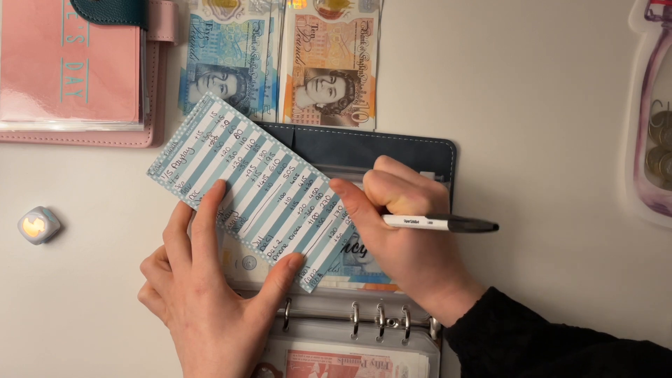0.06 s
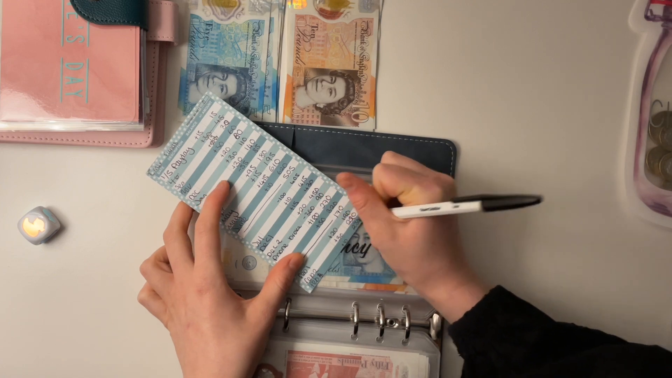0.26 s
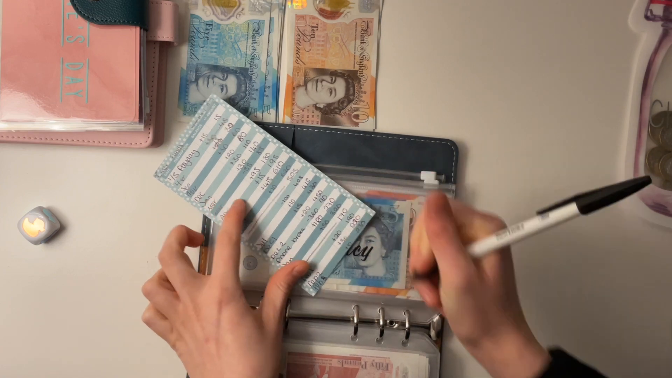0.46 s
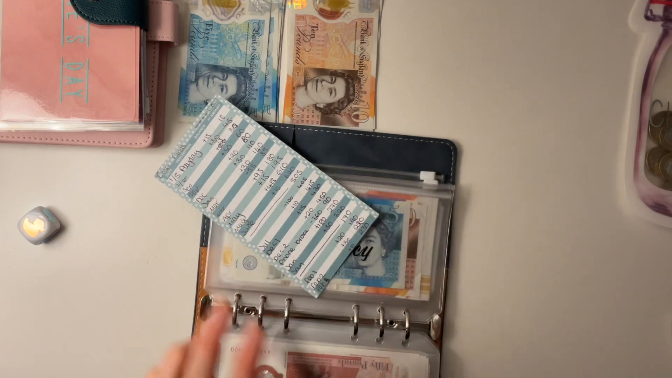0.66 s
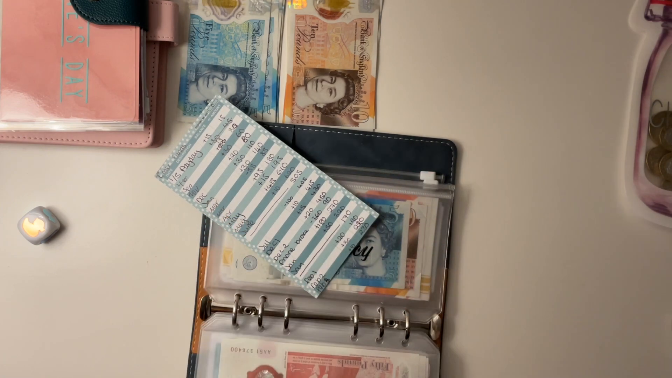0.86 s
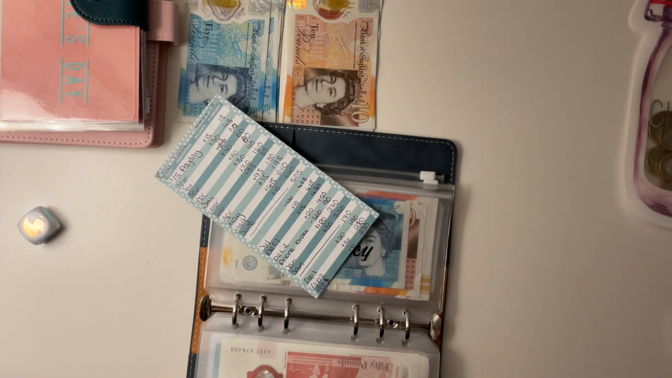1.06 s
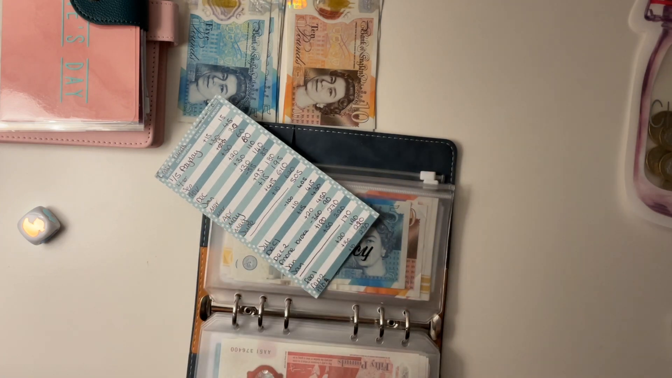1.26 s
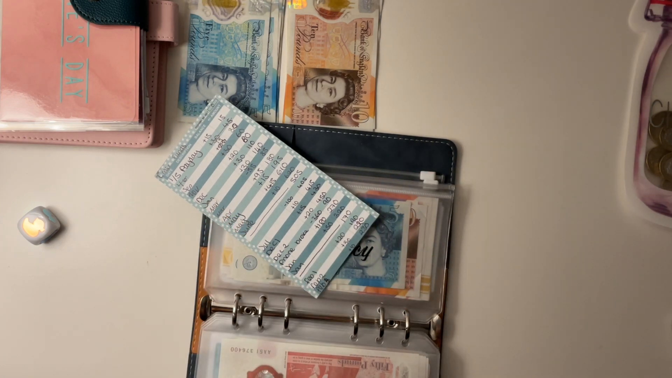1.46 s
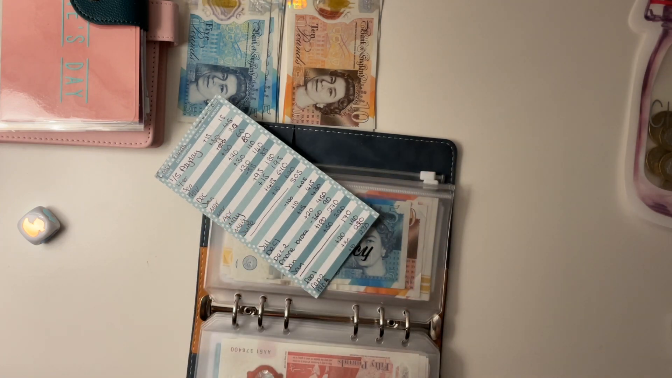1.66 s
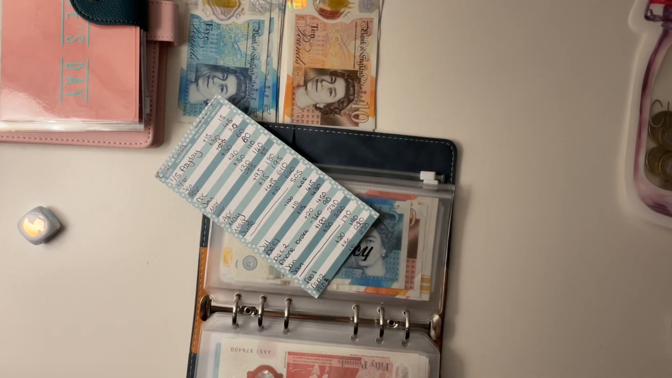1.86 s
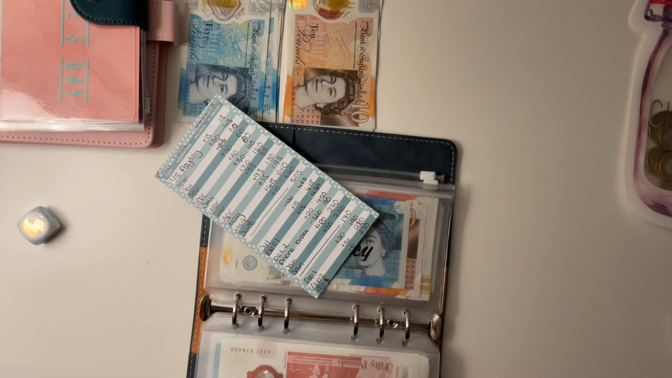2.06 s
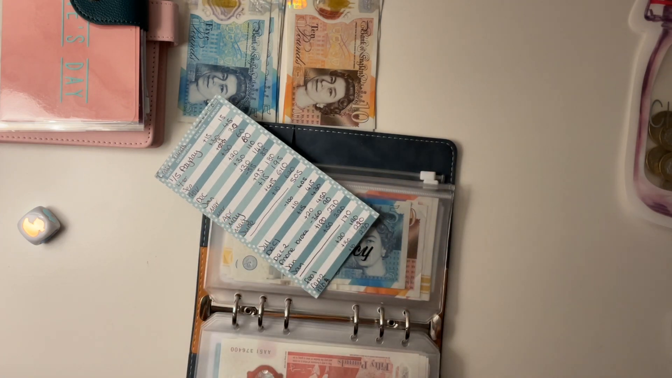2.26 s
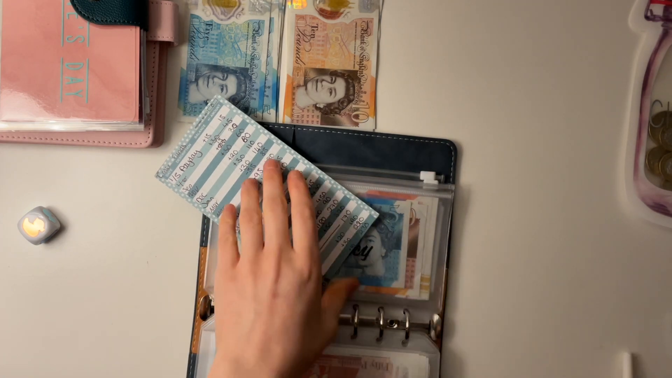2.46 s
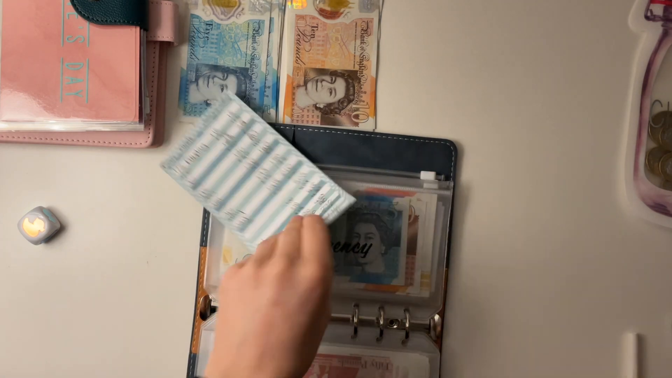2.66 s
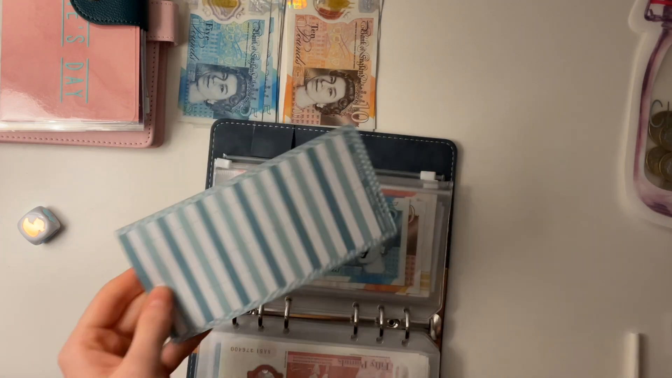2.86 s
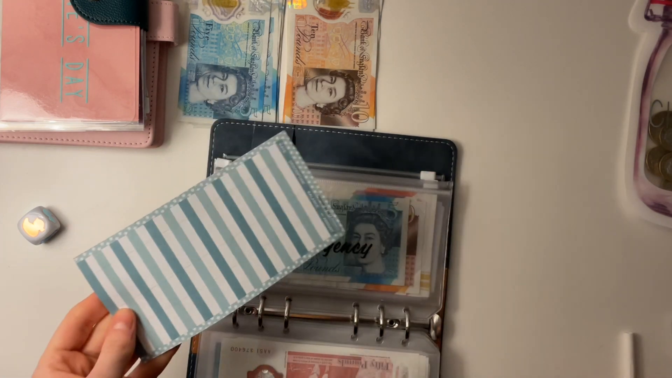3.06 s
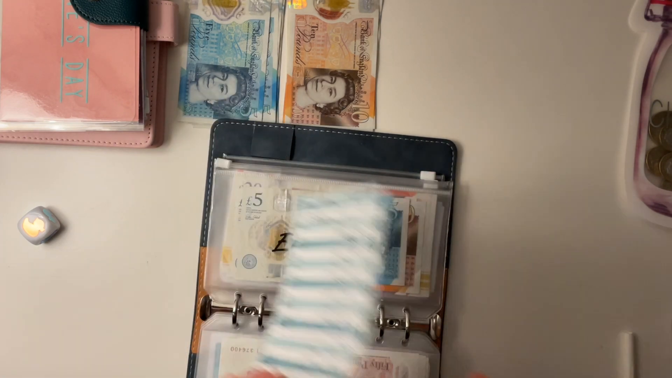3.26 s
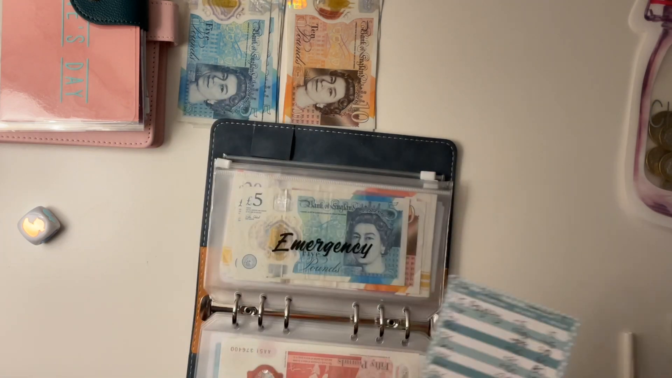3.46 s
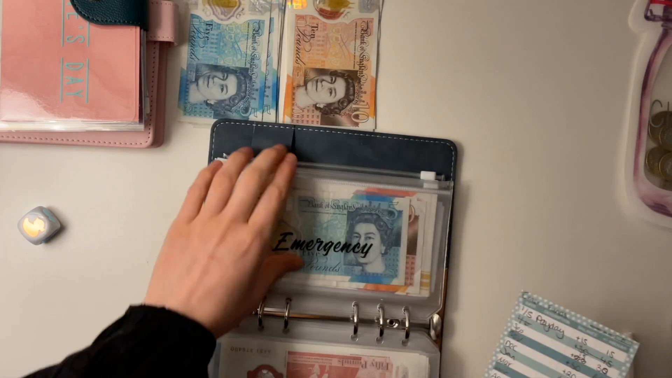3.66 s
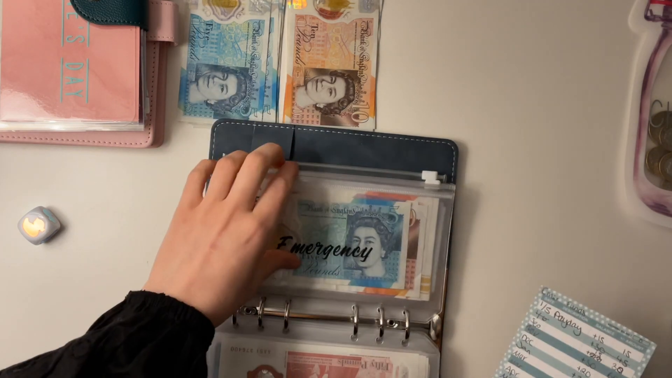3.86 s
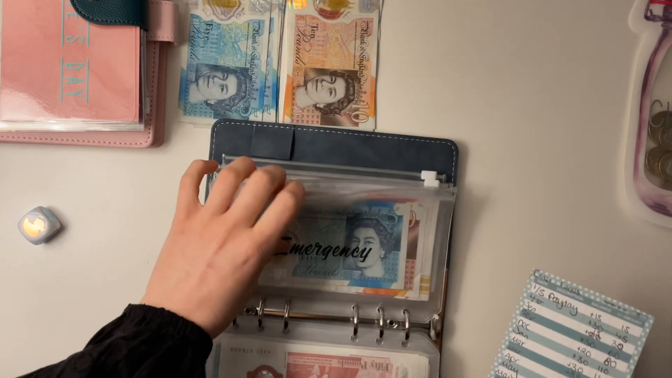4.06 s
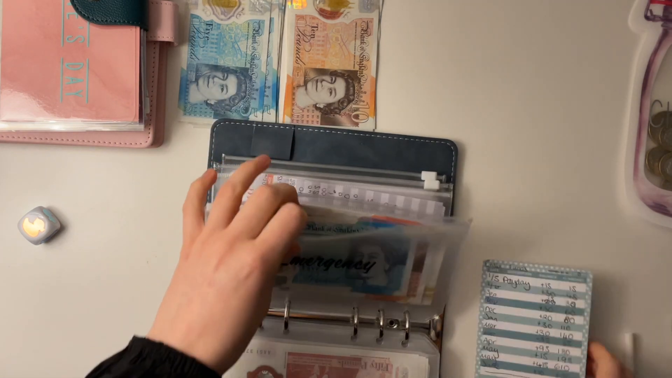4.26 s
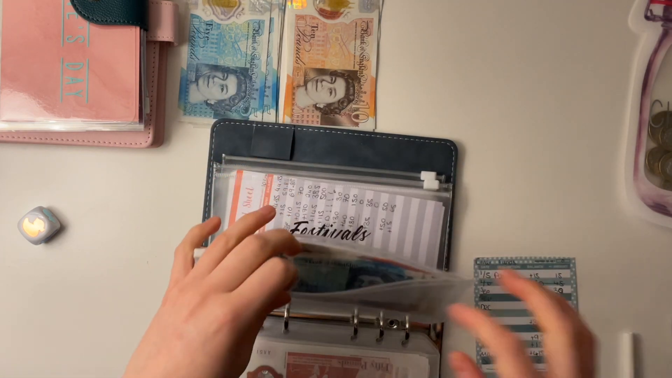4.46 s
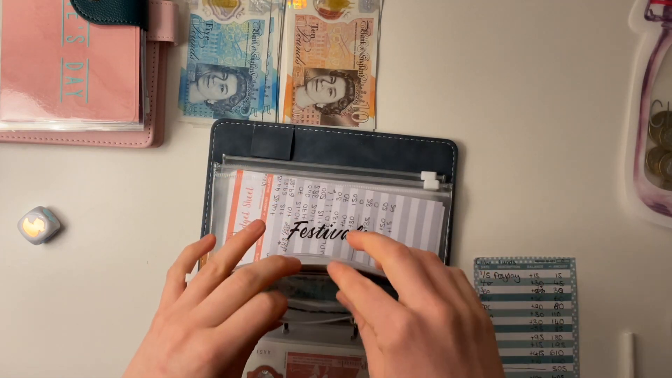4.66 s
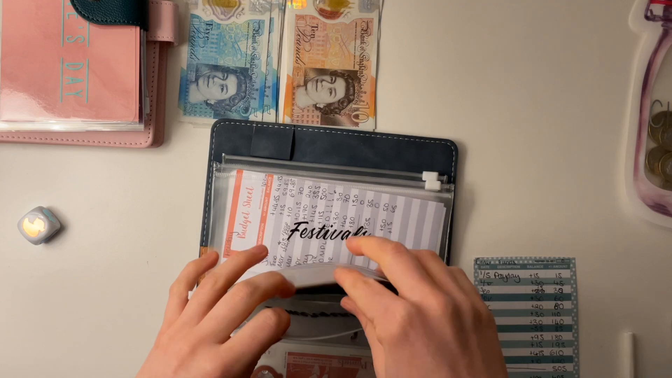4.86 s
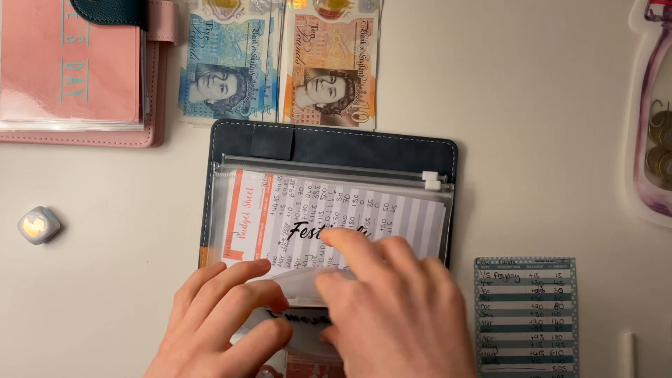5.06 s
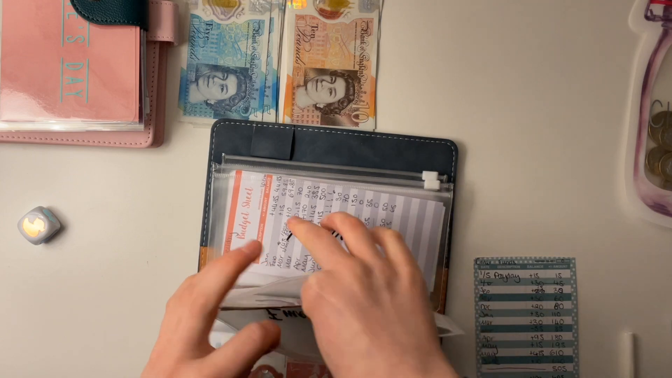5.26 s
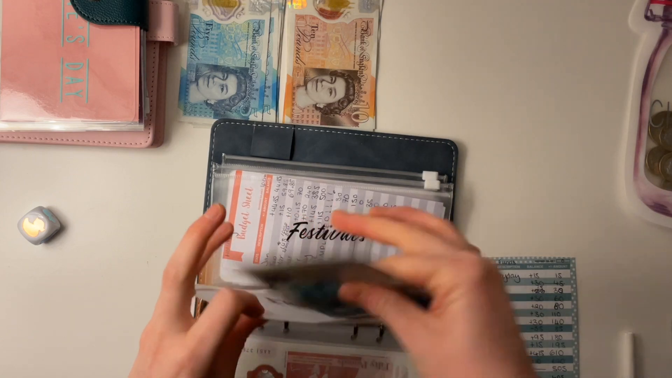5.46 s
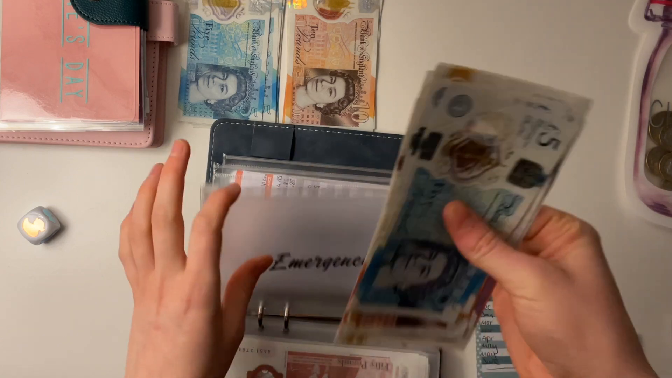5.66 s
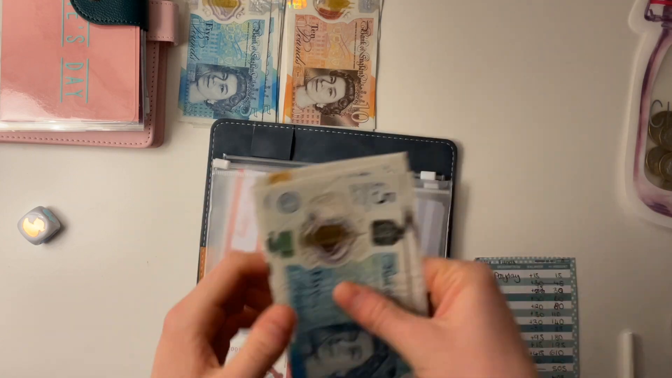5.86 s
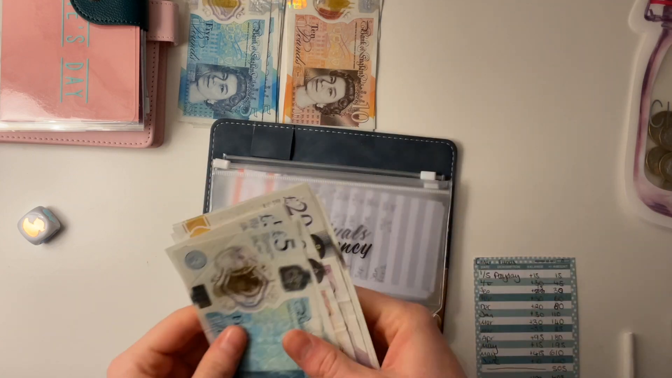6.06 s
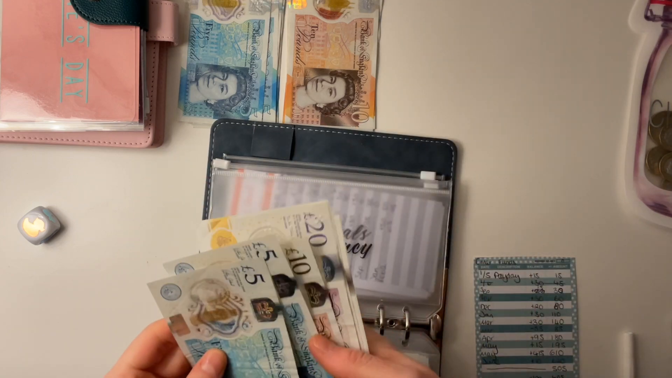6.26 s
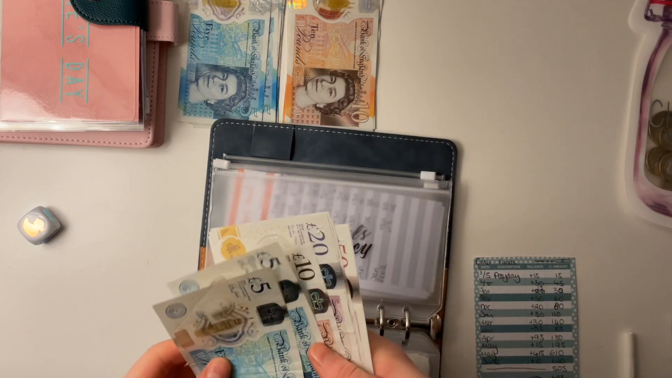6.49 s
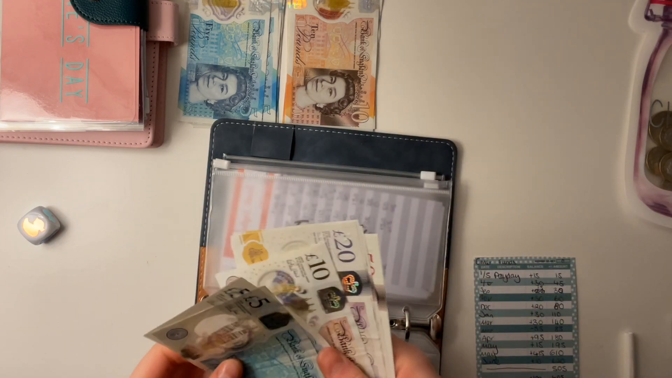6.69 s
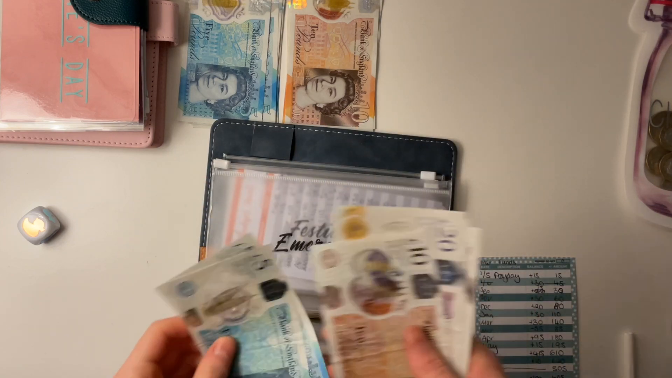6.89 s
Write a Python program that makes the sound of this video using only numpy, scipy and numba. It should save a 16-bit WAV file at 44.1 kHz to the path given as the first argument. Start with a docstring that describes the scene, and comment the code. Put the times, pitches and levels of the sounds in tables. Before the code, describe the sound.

Close, quiet handling at a desk: small clicks, loud papery card flicks, squeaky plastic sleeve, a rising swish of banknotes, light fanning ticks.

```python
"""Pen, card and banknotes at a desk

In a quiet room a pen is capped and put down, a card is flicked off a ring binder, fingers open a plastic
sleeve, slide banknotes out and fan them. Snaps and squeaks are clusters of noise cracks ringing a panel;
knocks and card flutters are decaying modes plus a noisy slap; rubs are uneven noise grains through sheet
resonances and a moving band. Leaning arms rumble as low noise, a small room rings briefly, and shaped
noise hisses faintly."""
import sys
import numpy as np
from scipy import signal
from scipy.fft import rfft, irfft
from scipy.io import wavfile
from scipy.ndimage import uniform_filter1d
from numba import njit

SR = 44100
rng = np.random.default_rng(int(sys.argv[2]) if len(sys.argv) > 2 else 0)


def elevation(decibels):
    """Turn decibel levels (scalar or array-like) into linear amplitude ratios."""
    levels = np.asarray(decibels, float)
    return 10 ** (levels / 20)


def materialize(psi):
    """Save the field psi as 16-bit PCM at rate SR to the path in sys.argv[1].

    A 1-D psi becomes a single channel; in a 2-D psi each row is a channel.
    """
    bounded = np.clip(np.atleast_2d(psi).T, -1, 1)
    quanta = np.round(bounded * 32767).astype(np.int16)
    wavfile.write(sys.argv[1], SR, quanta)


N = 305613
T = np.arange(N) / SR
DECAY_60 = np.log(1000)  # exp(-DECAY_60) is 60 dB down


def unit(x):
    """Scale to rms 1."""
    return x / np.sqrt(np.mean(x ** 2))


def shade(x, spectrum):
    """Colour x by (Hz, dB) points, falling away outside them."""
    hz, db = np.transpose(spectrum)
    log_f = np.log(np.arange(len(x) // 2 + 1) * SR / len(x) + 1)
    outside = np.maximum(np.log(hz[0]) - log_f, 0) + np.maximum(log_f - np.log(hz[-1]), 0)
    gain = elevation(np.interp(log_f, np.log(hz), db) - 40 * outside)
    return irfft(rfft(x) * gain, len(x))


def band(x, lo_hz, hi_hz):
    """Causal band-pass."""
    edges_hz = [lo_hz, min(hi_hz, .45 * SR)]
    return signal.sosfilt(signal.butter(2, edges_hz, "band", fs=SR, output="sos"), x)


def walk(rate):
    """Random line around 0 that glides to a new value every 1 / rate s; spread near 0.8."""
    k = int(SR / rate)
    steps = np.repeat(rng.standard_normal(N // k + 1), k)
    return 0.98 * uniform_filter1d(steps, k)[:N]


def add(out, s, x):
    """Mix x into out from time s on."""
    i = int(s * SR)
    out[i:i + len(x)] += x[:N - i]


def ring(t, hz, t60):
    """One decaying mode."""
    return np.sin(2 * np.pi * hz * t) * np.exp(-DECAY_60 * t / max(t60, .003))


def fade(t, rise_s, t60):
    """Quick rise, exponential fall."""
    return (1 - np.exp(-t / max(rise_s, .0002))) * np.exp(-DECAY_60 * t / max(t60, .004))


def resonate(x, hz, width_hz):
    """One resonance at least 30 Hz wide, gain 1 at the centre."""
    return signal.lfilter(*signal.iirpeak(hz, hz / max(width_hz, 30), fs=SR), x)


@njit
def svf(x, hz, width):
    """Band-pass whose centre moves; width is a share of the centre."""
    y, b, l = np.empty(len(x)), 0., 0.
    for i in range(len(x)):
        g = np.tan(np.pi * hz[i] / SR)
        v = (b + g * (x[i] - l)) / (1 + g * (g + width))
        b, l, y[i] = 2 * v - b, l + 2 * g * v, width * v
    return y


# buckling snaps of sheets and caps, with a few narrow squeaky rasps:
# t/s, panel peak level/dB, panel f/Hz, width/octaves, treble peak level/dB
SNAPS_AND_SQUEAKS = [(0.3017, -42.5, 3720, 2.5, -56), (0.3905, -46.5, 4840, 2.9, -60),
                     (0.4264, -50, 1780, 3.5, -49), (1.0248, -28, 7100, 3.3, -34),
                     (1.0285, -28, 5000, 2.1, -20), (1.032, -33.5, 5850, 2.4, -36),
                     (1.808, -53, 4840, 2.2, -41.5), (1.8183, -42.5, 2800, 2.5, -54.5),
                     (1.8394, -44, 4300, 0.99, -42), (2.1943, -50, 6860, 2.8, -58),
                     (2.4437, -17, 4270, 3.14, -28), (2.5614, -46, 3930, 1.8, -50),
                     (2.606, -27, 5960, 1.8, -30), (2.6267, -13, 2690, 1.4, -14),
                     (2.6537, -22.5, 1630, 3.3, -43.5), (2.685, -36.5, 3010, 1.5, -49),
                     (2.735, -48, 5020, 1.9, -52), (3.3404, -19.5, 1980, 2.76, -52),
                     (3.3463, -28, 1910, 0.59, -36.5), (3.405, -38, 4470, 1.2, -48),
                     (3.422, -32.5, 1900, 2.57, -48), (3.677, -42, 4650, 0.43, -77),
                     (3.699, -55, 4650, 0.4, -74), (3.7422, -47, 4050, 1.2, -70),
                     (4.0213, -50, 3750, 0.97, -42), (4.03, -55, 3740, 0.21, -71),
                     (4.0636, -33.5, 3530, 3.5, -42), (4.0784, -47, 3350, 0.37, -57),
                     (4.115, -60, 3100, 0.25, -77), (4.219, -51, 4270, 1.7, -45),
                     (4.2546, -29, 2500, 1.9, -30.5), (4.3192, -42.5, 2470, 1.8, -62.5),
                     (4.3657, -32.5, 1490, 3.1, -60), (4.541, -46.5, 2360, 1.6, -66),
                     (4.566, -46, 1400, 1.1, -75.5), (4.6466, -42.5, 1880, 4.2, -46),
                     (4.7272, -46.5, 2150, 2.1, -71.5), (4.8592, -47.5, 1490, 4.2, -49),
                     (4.9166, -48, 3850, 0.41, -71), (5.0559, -27, 1500, 2.1, -62.5),
                     (5.6525, -29.5, 4840, 1.9, -49), (5.7166, -25.5, 3760, 2.4, -20.5),
                     (5.929, -55.5, 4230, 1.3, -50), (5.982, -55.5, 2600, 0.45, -39.5),
                     (6.635, -34.5, 6760, 1.7, -49), (6.6634, -44, 6100, 1.2, -61.5),
                     (6.772, -52.5, 3300, 1.9, -50), (6.8032, -49, 5460, 0.47, -71),
                     (6.887, -37.5, 6560, 1.2, -44)]


def snaps_and_squeaks(rise_s=0.0023, crackle_db=7.0, ringing_db=-2.5):
    """Tiny cracks die out, ringing the panel at its own pitch, with a bright edge; narrow ones squeak."""
    out, t = np.zeros(N), T[:SR // 10]
    chance = rng.standard_normal((len(SNAPS_AND_SQUEAKS), 2, len(t)))
    for (s, db, hz, octaves, treble_db), (noise, sizes) in zip(SNAPS_AND_SQUEAKS, chance):
        octaves = max(octaves, .1)
        t60 = 0.028 + 0.011 / octaves  # the narrower the pitch, the longer it rings
        crack_gain = elevation(crackle_db * np.repeat(sizes, 30)[:len(t)])
        cracks = noise * crack_gain * fade(t, rise_s, t60)
        half = 2 ** (octaves / 2)
        note = resonate(cracks, hz, hz / 12)
        core = band(cracks, hz / half, hz * half)
        skirted = band(core, hz / half ** 5.0, hz * half ** 1.22)
        panel = unit(skirted) + elevation(ringing_db) * unit(note)
        edge = band(cracks, 7600, 15000)
        panel = elevation(db) * panel / np.abs(panel).max()
        edge = elevation(treble_db) * edge / np.abs(edge).max()
        add(out, s, panel + edge)
    return out


# knocks on desk and binder, and flutters of the flicked card:
# t/s, level/dB, main f/Hz, desk level/dB and slap level/dB against the main mode
KNOCKS_AND_FLUTTERS = [(0.31, -41, 845, -13.5, -10.5), (0.428, -44, 225, -7.5, -7.5),
                       (0.628, -34, 326, -15, -26), (0.641, -24, 320, -16.5, -23),
                       (0.649, -25, 193, -12, -38), (0.677, -61, 200, -14, -38), (0.744, -56, 223, -6, -23),
                       (1.017, -43, 580, -37, -8), (2.256, -44, 595, -10.5, -7.5),
                       (2.27, -49.5, 192, 0, -19), (2.442, -27.5, 590, -3.5, -11),
                       (2.608, -27.5, 566, -28, -29), (2.631, -32.5, 620, 4, 4.5),
                       (2.661, -15, 767, -18, -17), (2.898, -56.5, 200, 8, -24),
                       (2.733, -31.5, 720, -28, -18), (2.749, -37, 770, -23, -19),
                       (2.777, -52, 804, -25, -17), (2.915, -52, 766, -22, -17),
                       (2.935, -52.5, 782, -21, -22), (2.962, -44, 716, -26, -22), (3.17, -62, 199, 2, -16),
                       (3.34, -22.5, 860, -10, -3.5), (3.416, -31, 620, -3, -2), (3.432, -33, 420, -4, -22),
                       (3.449, -29.5, 408, -6, -14), (3.706, -53.5, 225, -17, -10),
                       (3.78, -60, 200, -3, -20), (3.745, -45.5, 664, -8, -7),
                       (4.081, -41.5, 426, -7, -12.5), (4.222, -41.5, 590, -20, -15),
                       (4.257, -30, 363, -7, -3.5), (4.287, -49, 450, -4, -15), (4.383, -51, 300, -10, -20),
                       (4.367, -32.5, 850, -19.5, -14.5), (4.564, -25.5, 746, -51, -11.5),
                       (4.644, -41, 360, -22, -13), (5.046, -46, 685, -33, -10),
                       (5.053, -21, 393, -12.5, -16), (5.215, -35, 227, -4.5, 1.5),
                       (5.376, -34.5, 205, -5, -2), (5.458, -51, 198, 2.5, -5), (5.609, -46, 426, -6.5, 2),
                       (5.651, -31, 320, -31, -13), (5.717, -35, 522, -13, -6),
                       (5.928, -42.5, 630, -11, -41.5), (5.974, -40.5, 640, -29, -10),
                       (5.983, -40, 687, -16, -18), (6.321, -43.5, 570, -25, -9),
                       (6.635, -42.5, 617, -23, -26.5), (6.805, -50.5, 623, -9, -7),
                       (6.893, -24.5, 756, -28, -39)]
# modes of the desk top: f/Hz, typical level/dB, t60/s
DESK_MODES = [(137.6, -3.5, 0.23), (198.7, -7.5, 0.12), (320, -14.5, 0.098), (430.5, -6.5, 0.085),
              (595, 6.5, 0.034), (790, -12.5, 0.077)]


def knocks_and_flutters(main_cycles=15.8, main_t60=0.082, slap_t60=0.06):
    """A soft push rings binder or card for a few cycles, with a papery slap and a share of the desk top."""
    out, t = np.zeros(N), T[:SR // 3]
    place = rng.standard_normal((len(KNOCKS_AND_FLUTTERS), len(DESK_MODES)))
    pages = rng.standard_normal((len(KNOCKS_AND_FLUTTERS), len(t)))
    for (s, db, hz, desk_db, slap_db), spot, noise in zip(KNOCKS_AND_FLUTTERS, place, pages):
        # the balance of the desk modes varies from hit to hit
        desk = sum(elevation(g_db + 2 * c) * ring(t, f, t60) for (f, g_db, t60), c in zip(DESK_MODES, spot))
        contact_s = max(0.0026 + 0.28 / hz, .0003)  # low pads are soft and give way more slowly
        main = ring(t, hz, min(main_cycles / hz, main_t60))
        rise = (1 - np.exp(-t / contact_s)) ** 2
        paper = unit(band(band(noise, 230, 1200), 500, 2000))
        slap = elevation(slap_db) * fade(t, contact_s, slap_t60) * paper
        add(out, s, elevation(db) * rise * (main + elevation(desk_db) * desk + slap))
    return out


# resonances of sleeve and sheets: f/Hz, width/Hz, level/dB before flaring
SHEET_MODES = [(1768, 250, 4.5), (2228, 40, -10.5), (2780, 75, -3.5), (3230, 500, 0.5), (3820, 27, -7),
               (4470, 73, -9), (4700, 40, -6.5), (5840, 34, -2), (6300, 140, 1), (6850, 120, 3)]
# colour of the rubbing hiss: f/Hz, relative level/dB per Hz
HISS_COLOUR = [(5500, -15.5), (8000, 1.5), (9000, -1), (12600, 6.5), (15900, -1)]
# colour of the low drag: f/Hz, relative level/dB per Hz
DRAG_COLOUR = [(100, -24), (170, 3), (365, -1.5), (775, -1), (895, -3), (1260, -5.5), (2400, -17),
               (3120, -43.5), (5280, -120)]


def rubs(grain_db=-0.5, rasp_width=1.49, plain_db=3.6):
    """Dense stick-slip of two sheets: uneven grains heard as a moving rasp, a hiss and a low drag."""
    rasp_gain, rasp_hz, hiss_gain, drag_gain = motion()
    grains = rng.standard_normal(N) * elevation(grain_db * walk(900))
    popping = ticks(rasp_gain)
    # the same grains shifted in time, so that modes and plain rasp do not cancel
    shifted = np.roll(grains, SR // 3)
    # each resonance flares on its own as the sheet bends
    flare = [elevation(6.5 * walk(20)) for _ in SHEET_MODES]
    modes = sum(elevation(db) * f * unit(resonate(shifted, hz, width_hz))
                for (hz, width_hz, db), f in zip(SHEET_MODES, flare))
    sheet = unit(modes) + elevation(plain_db) * unit(band(grains, 820, 12000))
    rasp = svf(svf(sheet, rasp_hz, rasp_width), rasp_hz, rasp_width)
    # even out the level, so that pitch and loudness are set apart
    rasp = rasp / np.sqrt(uniform_filter1d(rasp ** 2, size=4000))
    hiss = unit(shade(np.roll(grains, SR), HISS_COLOUR))
    drag = unit(shade(shifted, DRAG_COLOUR))
    flicker = [elevation(1.0 * walk(60)) for _ in range(3)]
    return (rasp_gain * popping * flicker[0] * rasp
            + hiss_gain * flicker[1] * hiss
            + drag_gain * flicker[2] * drag)


# long draws, the card peeled off the binder and the notes pulled from the sleeve, as lists of points:
# t/s, rasp level/dB, rasp f/Hz, hiss level/dB, drag level/dB
LONG_DRAWS = [
    [(2.54, -66, 4090, -59, -60), (2.57, -48.5, 4200, -49.5, -67), (2.6, -52.5, 3800, -53, -63),
     (2.615, -41.5, 3200, -46, -41.5), (2.669, -43, 2560, -42, -44.5), (2.7, -43, 3270, -55, -60),
     (2.73, -42, 3940, -45.5, -57), (2.742, -52.5, 4530, -54, -55.5), (2.78, -59.5, 4800, -53, -68.5),
     (2.82, -81, 4280, -76, -72)],
    [(4.7, -86, 2800, -86, -80), (4.75, -66.5, 2760, -81, -67), (4.88, -63, 3200, -82, -65.5),
     (4.93, -58.5, 3250, -94, -68), (4.99, -51.5, 3280, -67, -53), (5.04, -48, 3180, -62, -51),
     (5.09, -46, 2450, -53.5, -49.5), (5.15, -47, 3130, -49.5, -53), (5.22, -50.5, 3460, -56, -48),
     (5.245, -49, 3870, -50, -51.5), (5.27, -45, 4060, -43, -58.5), (5.35, -46.5, 3500, -44, -53),
     (5.392, -40.5, 3500, -38.5, -42.5), (5.42, -48.5, 4650, -46.5, -58.5), (5.46, -48.5, 4700, -45.5, -57),
     (5.49, -42, 4170, -39.5, -63), (5.516, -40, 5350, -30.5, -60), (5.536, -44.5, 5800, -37.5, -59),
     (5.556, -59, 5030, -51, -60), (5.59, -66, 5400, -61, -64), (5.622, -64, 4430, -67, -68)],
]
# short swipes of skin, card and notes that swell and fade:
# middle t/s, length t/s, rasp level/dB, rasp f/Hz, hiss level/dB, drag level/dB
SHORT_SWIPES = [(0.317, 0.039, -54.5, 3200, -59.5, -62), (0.353, 0.051, -64, 5300, -56, -69.5),
                (0.39, 0.026, -72, 4600, -60.5, -66), (0.442, 0.1, -73.5, 3300, -72, -66),
                (0.552, 0.047, -80, 3500, -68, -76), (0.649, 0.038, -80, 1600, -81, -58.5),
                (0.872, 0.11, -79, 4200, -62, -79), (1.02, 0.032, -68, 4400, -61, -80),
                (1.088, 0.049, -68, 4900, -62, -75), (1.123, 0.18, -75.5, 4300, -68, -74.5),
                (1.638, 0.098, -61, 2920, -78, -68.5), (1.819, 0.026, -62, 4530, -54, -90),
                (1.844, 0.038, -68, 4320, -61, -91), (2.216, 0.15, -75.5, 3600, -68, -73.5),
                (2.507, 0.068, -54.5, 4170, -58, -54), (2.444, 0.018, -48, 2400, -79, -61),
                (2.377, 0.21, -68.5, 2440, -74.5, -76), (2.914, 0.13, -101, 3500, -86, -70),
                (3.205, 0.15, -74.5, 3500, -74.5, -75.5), (3.337, 0.019, -59.5, 2800, -79, -62),
                (3.388, 0.063, -54.5, 2830, -55, -67), (3.431, 0.06, -54, 1930, -65, -46.5),
                (3.698, 0.039, -69, 4300, -80, -63), (3.758, 0.071, -68.5, 3700, -74, -66),
                (4.054, 0.086, -66, 3300, -65, -70), (4.317, 0.076, -68, 2800, -71, -57),
                (4.24, 0.13, -70.5, 2750, -77, -64), (4.803, 0.024, -55.5, 2940, -60, -59),
                (5.461, 0.017, -46.5, 2000, -60, -46), (5.534, 0.027, -55, 2000, -65, -50.5),
                (5.652, 0.024, -45, 4250, -52, -42), (5.991, 0.19, -75, 3520, -65.5, -71.5),
                (6.11, 0.096, -59, 6300, -57, -74), (6.182, 0.059, -70, 5750, -60.5, -71),
                (6.329, 0.052, -65.5, 5060, -70, -64.5), (6.484, 0.09, -72.5, 4000, -66, -72),
                (6.633, 0.13, -57, 5700, -61.5, -65.5), (6.809, 0.045, -63, 5200, -54.5, -75),
                (6.879, .06, -60.5, 6000, -48, -69.5), (6.93, 0.045, -60, 4900, -56, -67)]
# loose sheets rustling after a flick: t/s, rasp level/dB, rasp f/Hz, hiss level/dB, drag level/dB
SHEET_SETTLES = [(1.027, -43.5, 4560, -41, -64), (2.445, -38, 3800, -39, -39.5),
                 (3.338, -59, 2600, -58, -42.5), (4.065, -52.5, 3280, -56, -58),
                 (4.255, -43, 2830, -44, -47.5), (4.365, -51, 2070, -79, -48),
                 (4.565, -64, 1495, -80, -47.5), (4.647, -60.5, 2100, -78, -53.5),
                 (5.65, -46.5, 4230, -57, -41.5), (5.716, -44.5, 4130, -39.5, -44.5)]
# sleeves and fingers never quite still: rasp level/dB, rasp f/Hz, hiss level/dB, drag level/dB
FAINT_FIDGET = (-80.5, 3516, -79, -76)


def motion():
    """Rasp, hiss and drag gains and rasp pitch of all rubbing; powers add, the louder rub sets the pitch."""
    swipe_edge = 2.4  # 2 = bell, more = a hold with sudden ends
    rise_s, settle_s, stop_s, stop_edge = 0.004, 0.028, 0.079, 5.4
    windup_db, windup_s = -15, 0.0055
    still_db, still_s = -47.5, 0.091  # recent rasp this strong ducks the fidget by 3 dB; memory of it
    rubbing = []
    for draw in LONG_DRAWS:
        s, *columns = np.transpose(draw)
        active = (T >= s[0]) & (T <= s[-1])
        rubbing.append((active, *(np.interp(T, s, c) for c in columns)))
    for s, length, *row in SHORT_SWIPES:
        rubbing.append((np.exp(-np.abs(2 * (T - s) / length) ** swipe_edge), *row))
    for s, *row in SHEET_SETTLES:
        t = np.maximum(T - s, 0)
        # the sheet strains around the moment it lets go
        windup = elevation(windup_db) * np.exp(-np.abs(T - s) / windup_s)
        # the rustle fades, then is cut off abruptly
        fall = np.exp(-t / settle_s - (t / stop_s) ** stop_edge)
        rubbing.append((windup + (1 - np.exp(-t / rise_s)) * fall, *row))
    # the faint rustle sinks during strong rasping and returns a moment later
    keep = np.exp(-1 / (still_s * SR))
    rasp_power = sum((row[0] * elevation(row[1])) ** 2 for row in rubbing)
    recent = signal.lfilter([1 - keep], [1, -keep], rasp_power)
    rubbing.append((1 / np.sqrt(1 + recent / elevation(still_db) ** 2), *FAINT_FIDGET))
    rasp, pitch, hiss, drag = np.zeros((4, N))
    for shape, rasp_db, rasp_hz, hiss_db, drag_db in rubbing:
        power = (shape * elevation(rasp_db)) ** 2
        rasp = rasp + power
        pitch = pitch + power * rasp_hz
        hiss = hiss + (shape * elevation(hiss_db)) ** 2
        drag = drag + (shape * elevation(drag_db)) ** 2
    return np.sqrt(rasp), pitch / rasp, np.sqrt(hiss), np.sqrt(drag)


def ticks(rasp_gain):
    """Popping creases: a gain that jumps at random, most in hard rubbing, and falls back in some ms."""
    ticks_per_s, tick_db, spread_db, t60 = 65, -3.5, 5, 0.0081
    half_size_db = -60  # rasp gain at which pops have half their size
    pops = (rng.random(N) < ticks_per_s / SR) * elevation(tick_db + spread_db * rng.standard_normal(N))
    pops = pops * rasp_gain / (rasp_gain + elevation(half_size_db))
    return 1 + signal.lfilter([1], [1, -np.exp(-DECAY_60 / (t60 * SR))], pops)


# arms leaning on the desk: t/s, level/dB of the push on top of the resting rumble
DESK_LEANS = [(0.4, -72), (0.679, -44), (1.0, -83), (1.32, -63), (1.41, -72), (1.46, -72), (2.0, -84),
              (2.3, -65), (2.53, -50.5), (2.64, -47), (2.711, -56), (3.36, -47), (3.47, -53.5), (3.76, -82),
              (4.11, -79), (4.26, -54), (4.38, -59), (4.57, -62), (4.69, -68), (5.07, -77), (5.23, -50),
              (5.33, -62), (5.44, -54), (5.67, -57), (5.76, -66), (5.98, -79), (6.18, -69), (6.66, -79)]


def leaning():
    """Arms on the desk make a dull low rumble that swells with each push."""
    rise_s, fall_s, resting_db = 0.013, 0.031, -77
    pushes = sum(elevation(db) * np.exp(-np.abs(T - s) / np.where(T < s, rise_s, fall_s))
                 for s, db in DESK_LEANS)
    resting = elevation(resting_db + 1.0 * walk(3.1))
    return (resting + pushes) * unit(band(rng.standard_normal(N), 57, 130))


# three overlapping bands of the room tail: reference f/Hz, t60/s, relative level/dB
ROOM_TAIL = [(278, 0.19, -19.5), (2220, 0.29, -15.5), (9200, 0.083, -29.5)]


def room(x):
    """Diffuse echoes that build up in a few ms and die fastest in the treble."""
    t = T[:SR // 2]
    tail = np.zeros(len(t))
    for hz, t60, db in ROOM_TAIL:
        echoes = unit(band(rng.standard_normal(len(t)), hz / 1.59, hz * 4.02))
        energy_scale = np.sqrt(DECAY_60 / t60 / SR)  # a longer tail is no louder in total
        tail += elevation(db) * echoes * np.exp(-DECAY_60 * t / t60) * energy_scale
    return signal.fftconvolve(x, tail * (1 - np.exp(-t / 0.00092)))[:N]


# colour of the quiet room: f/Hz, relative level/dB per Hz
AIR_COLOUR = [(18, -53.5), (30, -10), (43, -4.5), (131, -7.5), (273, -16), (355, -12.5), (404, -6.5),
              (449, -16), (1100, -27), (1220, -14), (2170, -15), (2410, -14), (3140, -17.5), (8980, -17.5),
              (16000, -18)]


def air():
    """Steady hiss and a low murmur of the house that waver a little together."""
    return elevation(-73.5 + 0.41 * walk(7.4)) * unit(shade(rng.standard_normal(N), AIR_COLOUR))


def scene():
    """Hands and sheets close to the microphone, the room around them."""
    near = snaps_and_squeaks() + knocks_and_flutters() + rubs() + leaning()
    return (near + room(near) + air())[None]


def roll_off(x):
    """The treble ends steeply here."""
    return signal.sosfilt(signal.butter(12, 17020, fs=SR, output="sos"), x)


def record(dry):
    """A phone with a steep low cut and a steep top cut."""
    low_cut = signal.butter(4, 54, "high", fs=SR, output="sos")
    top_cut = signal.ellip(8, .3, 60, 15900, fs=SR, output="sos")
    mix = signal.sosfilt(np.vstack([low_cut, top_cut]), dry)
    return roll_off(mix)


dry = scene()
out = record(dry)
materialize(out)
```